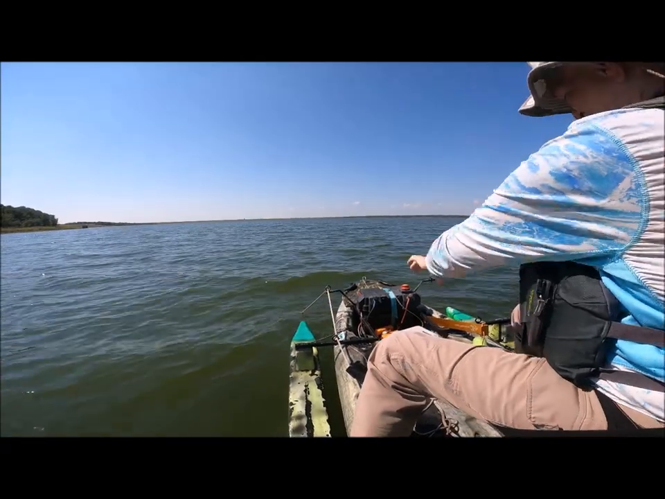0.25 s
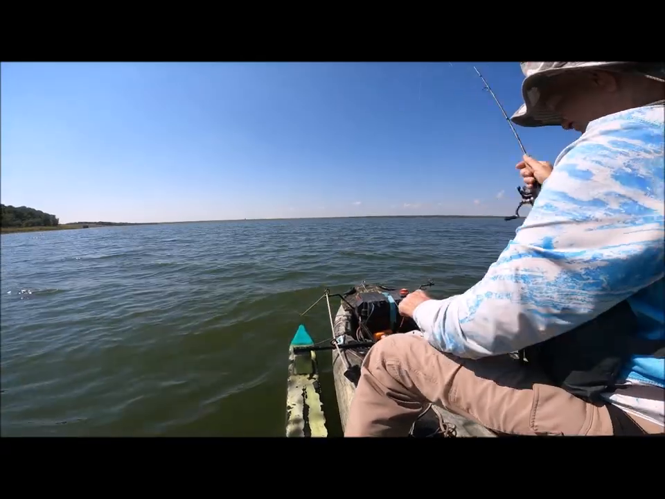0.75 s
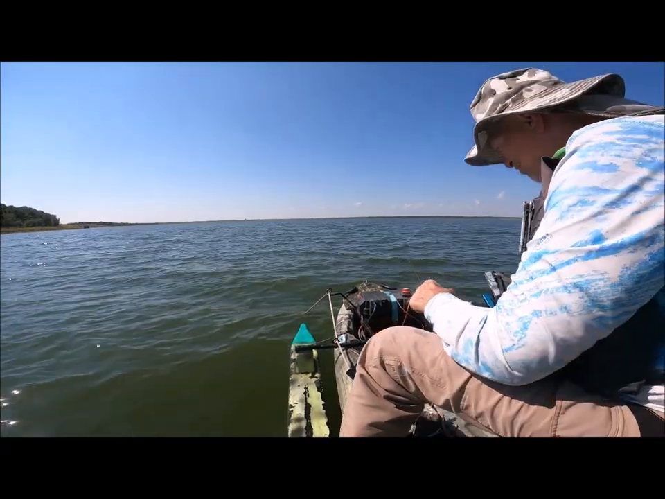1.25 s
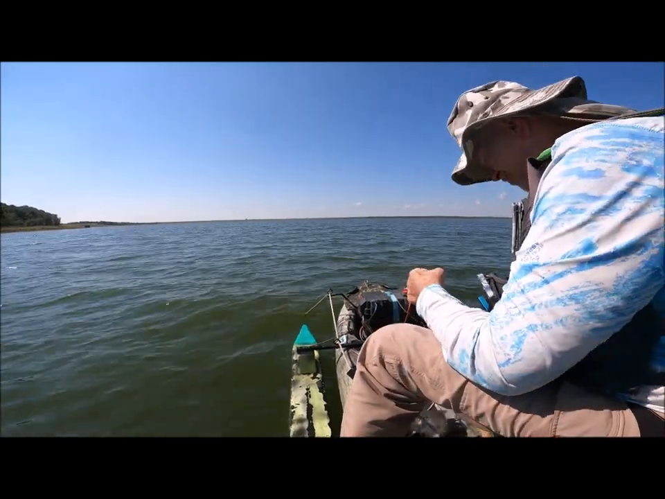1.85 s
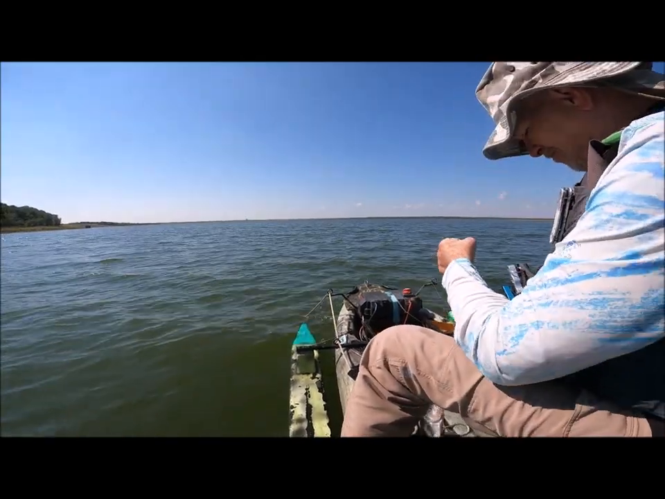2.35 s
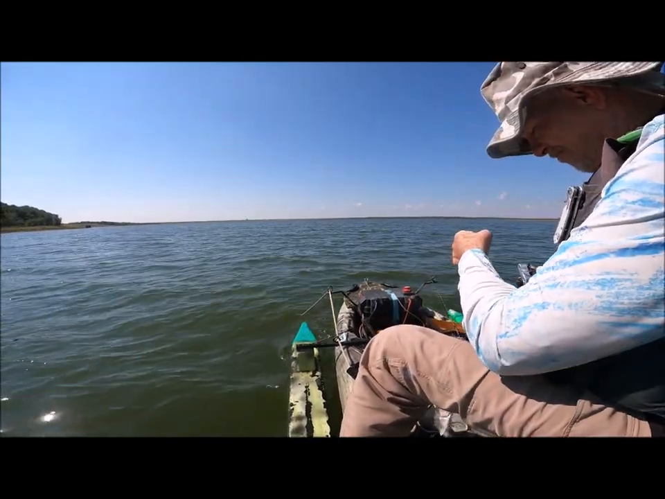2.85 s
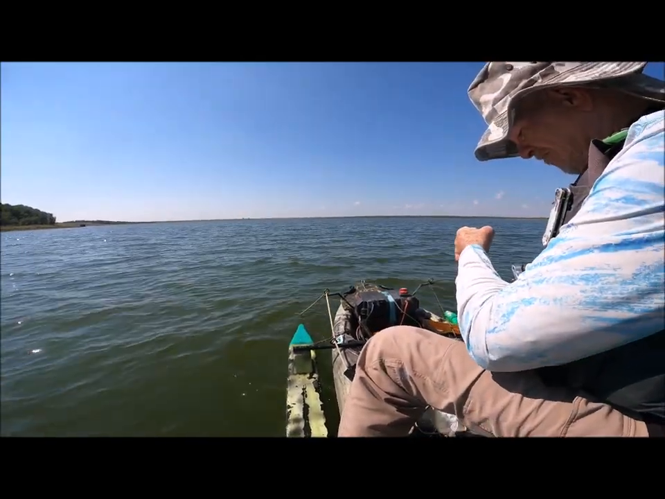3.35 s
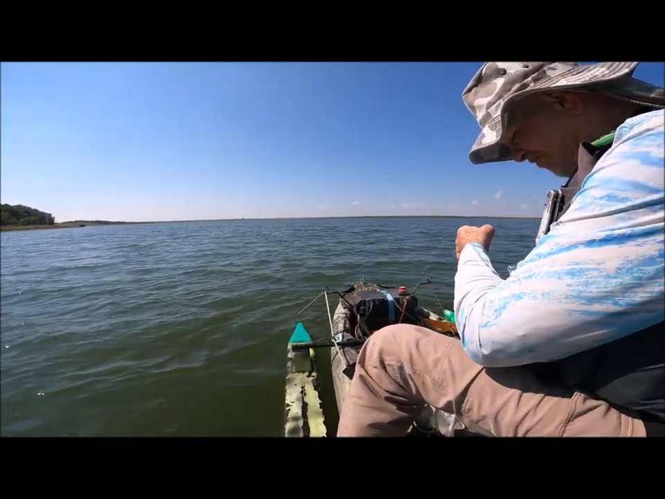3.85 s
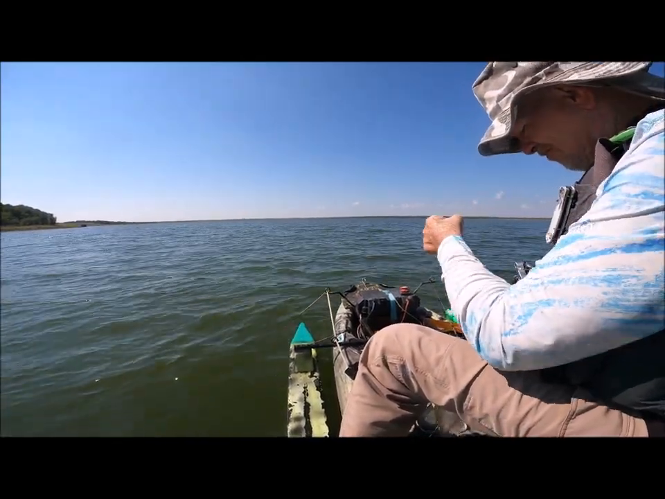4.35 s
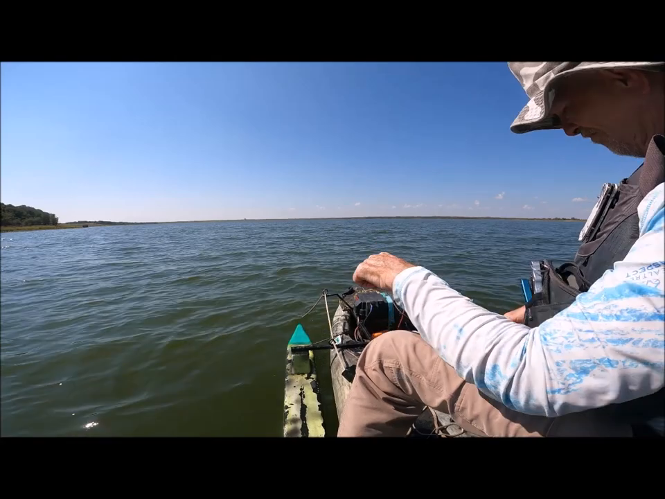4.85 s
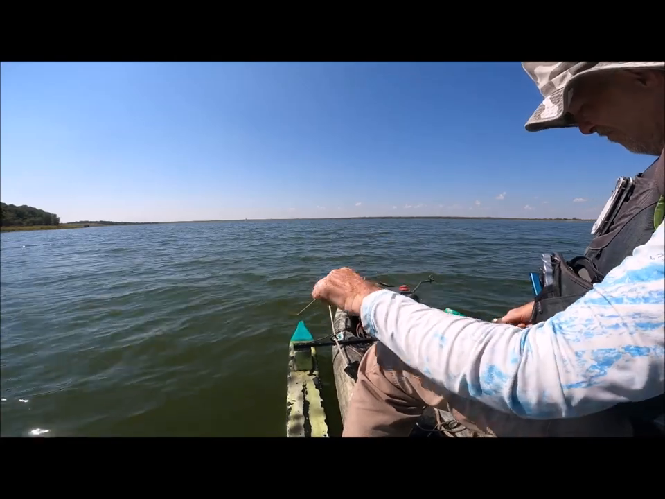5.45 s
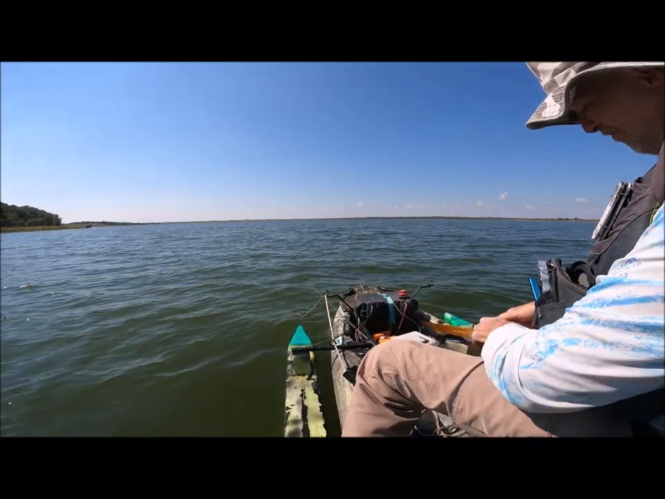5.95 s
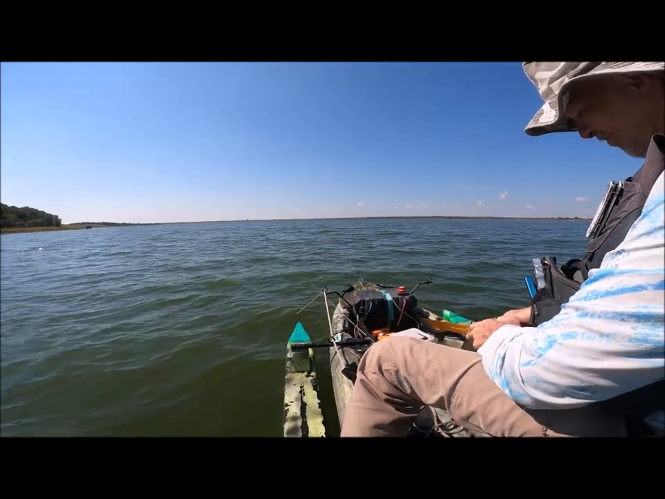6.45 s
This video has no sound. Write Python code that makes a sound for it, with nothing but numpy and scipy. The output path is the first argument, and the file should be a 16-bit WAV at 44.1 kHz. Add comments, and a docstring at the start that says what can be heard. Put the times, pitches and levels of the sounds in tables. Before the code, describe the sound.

Close on a small boat, water churns and trickles under the hull. Faint laps begin, then hard plastic knocks, bright tackle clicks and short rasps cluster around the loudest hollow slap just before two seconds. The middle calms to gurgling plips and lighter slaps; the end brings another run of wet, booming slaps. A sleeve rustles faintly and wind buffets the microphone outdoors.

```python
"""Choppy lake water slaps a hollow plastic kayak: trapped air thumps, the hull rings, spray splashes.
Light laps open the scene; soon an angler's gear knocks, clicks and rasps (noise bursts, damped partials),
and the heaviest slap lands at 1.84 s. Drips and gurgles (gliding sines) lead on past 3.5 s to a second
run of strong slaps from 5.1 to 6.1 s. Throughout, bubbles and noise churn under the hull, a sleeve
rustles, the boat heaves with a deep rumble, a faint hiss comes and goes and wind buffets the microphone."""
import sys
import numpy as np
from scipy import signal
from scipy.fft import rfft, irfft, next_fast_len
from scipy.io import wavfile
from scipy.ndimage import uniform_filter1d, map_coordinates

SR = 44100
rng = np.random.default_rng(int(sys.argv[2]) if len(sys.argv) > 2 else 0)


def bounce(signal):
    """Save signal as a 16-bit WAV file at the path given by the first command-line argument."""
    frames = np.transpose(np.atleast_2d(signal))
    limited = np.clip(frames, -1, 1)
    pcm = np.round(limited * 32767).astype(np.int16)
    wavfile.write(sys.argv[1], SR, pcm)


N = 295417

# waves meeting the hull: [t/s, level/dB, air pocket f/Hz,
# hardness/dB (0 = flat smack, -30 = soft gulp), pocket t60/s]
WAVE_SLAPS = [(0.069, -29.5, 184, -1.5, 0.069), (0.087, -28, 458, -9, 0.074), (0.349, -28, 156, -25, 0.077),
              (0.48, -28, 149, -6, 0.053), (0.658, -31.5, 265, -46, 0.078), (0.865, -29, 229, -18, 0.093),
              (1.181, -30, 141, 2, 0.19), (1.626, -28.5, 156.6, -34, 0.11), (1.725, -27.5, 148, -14, 0.042),
              (1.844, -10, 192, -3.5, 0.071), (1.874, -21.5, 215, -22, 0.055), (1.904, -21, 190, -8, 0.094),
              (2.096, -22, 225, -23, 0.079), (2.118, -30, 167, -41, 0.098), (2.19, -26.5, 217, -2, 0.053),
              (2.262, -25, 270, -21, 0.093), (2.278, -23.5, 271, 4, 0.067), (2.741, -28.5, 182, -2, 0.07),
              (2.84, -31, 165.4, -33, 0.29), (3.179, -28.5, 174, -13, 0.15), (3.2, -19.5, 410, -17, 0.024),
              (3.472, -31.5, 138, -33, 0.087), (3.684, -21, 294, -40, 0.13),
              (4.034, -24.5, 177, -20, 0.077), (4.398, -28.5, 305, -9, 0.034), (4.505, -33, 280, -43, 0.17),
              (4.685, -33.5, 155, -9, 0.19), (4.745, -31.5, 156, -42, 0.2), (4.886, -31.5, 167, -37, 0.13),
              (5.108, -17.5, 240, -12, 0.044), (5.14, -22, 163.4, -25, 0.087),
              (5.366, -38.5, 261, -39, 0.11), (5.385, -33, 182, -36, 0.12), (5.497, -27.5, 186, -7, 0.071),
              (5.715, -27.5, 216, -58, 0.099), (5.784, -17.5, 177.3, -28, 0.085),
              (5.852, -25.5, 206, -4, 0.055), (6.017, -14, 268, -12.5, 0.055),
              (6.059, -15.5, 244, -16, 0.079), (6.494, -35, 194, -23, 0.1), (6.61, -29, 150, -36, 0.081)]
# ring of the hollow hull: [f/Hz, level/dB, t60/s], detuned and re-weighted at each slap
HULL_MODES = [(138, -3.5, 0.28), (172.3, -0.5, 0.31), (214.5, 2, 0.16), (288.4, 2.5, 0.18),
              (341, 0.5, 0.13), (403, -16, 0.091), (482.3, -8, 0.082), (578.4, -8.5, 0.15),
              (664, -29.5, 0.054), (970, -17.5, 0.092)]
# water washing along the hull: [t/s at its height, length/s, level/dB, bubble f/Hz]
HULL_WASHES = [(0.88, 0.11, -54.5, 1360), (1.365, 0.08, -44.5, 1370), (1.6, 0.027, -44, 760),
               (1.86, 0.022, -33.5, 576), (1.996, 0.05, -45.5, 1150), (2.19, 0.038, -45, 796),
               (2.288, 0.055, -44.5, 780), (2.562, 0.086, -55.5, 770), (2.776, 0.097, -50.5, 1330),
               (3.21, 0.023, -47, 596), (3.282, 0.062, -46, 1094), (3.588, .06, -50.5, 890),
               (4.391, 0.044, -48.5, 1520), (5.403, 0.036, -53, 734), (5.47, 0.077, -47, 448),
               (6.058, 0.05, -42.5, 1245)]
# wavelets clapping shut along the hull: [t/s, level/dB, cavity f/Hz]
WAVELET_POPS = [(0.863, -37.5, 640), (0.924, -41.5, 770), (1.098, -40.5, 910), (1.276, -40, 1190),
                (1.317, -41, 564), (1.347, -38, 1670), (1.381, -39, 1770), (1.902, -28, 438),
                (1.975, -37, 1510), (2.132, -31, 933), (2.179, -41, 1900), (2.221, -34, 950),
                (2.746, -32.5, 573), (3.199, -29, 296), (3.454, -36, 1300), (3.52, -40.5, 2200),
                (4.372, -37, 1370), (4.642, -42.5, 1210), (4.699, -38, 1640), (4.759, -36.5, 1650),
                (4.787, -42, 1630), (5.107, -28.5, 1320), (5.357, -33.5, 1040), (5.383, -26, 1064),
                (5.56, -28.5, 566), (6.017, -25.5, 393)]
# drops and gurgling bubbles beside the boat: [t/s, level/dB, f/Hz, glide/(octaves per s), t60/s]
WATER_PLIPS = [(0.49, -37.5, 498, 0.5, 0.14), (1.847, -21, 332, -1.5, 0.11),
               (2.665, -42.5, 1650, -2.5, 0.077), (2.757, -42, 1770, 3, .05), (2.795, -44, 1660, 1, 0.088),
               (3.566, -46, 1146, -10, .06), (3.578, -35.5, 368, -12, 0.069), (3.734, -33, 283, -4, 0.15),
               (4.036, -32.5, 342, 0, 0.18), (4.073, -46.5, 1750, 1, 0.046), (4.106, -48, 2510, 8, 0.074),
               (4.126, -40, 1700, 16, 0.038), (4.291, -40, 995, -20.5, 0.045),
               (4.376, -32, 324, -20, 0.087), (4.518, -39.5, 576, 0.5, 0.16),
               (5.366, -40.5, 1174, -5.5, 0.15), (5.392, -38.5, 956, -14.5, 0.096),
               (5.454, -36.5, 379, -2, 0.36), (5.493, -40.5, 780, 2, 0.082), (6.496, -34, 345, 1, 0.2)]
# slosh under the hull between slaps: [t/s, level/dB]
CHOP_LEVEL = [(0.0, -39.5), (0.24, -53.5), (1.38, -38), (1.68, -48), (2.03, -45), (2.75, -40.5),
              (2.97, -44.5), (4.25, -51.5), (5.0, -47), (5.45, -47.5), (5.6, -48.5), (6.36, -48),
              (6.7, -48.5)]
# hull heaving on a swell or under the angler's weight: [t/s at its height, level/dB]
HULL_HEAVES = [(0.4, -34.5), (0.578, -35.5), (0.898, -41), (1.231, -33.5), (1.508, -37), (1.87, -29),
               (4.529, -36), (4.722, -41), (5.14, -38), (5.478, -36), (5.665, -37), (5.828, -33),
               (6.101, -29.5), (6.471, -34.5), (6.6, -32)]
# hard gear on the deck: [t/s, level/dB, brightness/dB (above 0 = sharp edge, below = dull boom), t60/s]
GEAR_KNOCKS = [(0.9754, -23, 7.5, 0.072), (1.271, -35, 0.5, 0.34), (1.502, -18, 5.5, 0.068),
               (1.524, -19.5, 13.5, 0.041), (1.547, -32.5, 9, 0.25), (1.9746, -23.5, 2.5, 0.065),
               (2.074, -15.5, 4, 0.059), (2.132, -16.5, -2, 0.034), (2.2204, -22, 0.5, 0.11),
               (2.656, -32, 0, 0.11), (2.997, -33.5, 2, 0.12), (3.159, -32.5, 14, 0.053),
               (4.494, -26, 3, 0.073), (5.071, -32.5, 4, 0.47), (5.5615, -25, -4, 0.096),
               (6.082, -25, 3.5, 0.13)]
# small tackle clicking: [t/s, level/dB, f/Hz, crack level/dB re the click]
TACKLE_CLICKS = [(0.334, -55, 5200, -6), (0.685, -58, 5170, -1.5), (0.717, -60, 5200, -2),
                 (0.4545, -48.5, 3540, -6), (1.5485, -24, 3940, -26), (1.652, -43.5, 5180, -16),
                 (1.736, -46.5, 5120, -4.5), (1.8265, -39, 2970, -15), (2.055, -29, 4210, -13.5),
                 (2.33, -33, 3700, -21), (2.4465, -36.5, 2910, -14.5), (2.537, -48, 4400, -3),
                 (2.628, -36.5, 3560, -38), (2.6597, -31.5, 5070, -35), (2.776, -51, 4440, -5),
                 (3.012, -42, 5500, -22), (3.14, -39.5, 4400, -17), (3.241, -26, 4040, -20),
                 (3.326, -66.5, 5230, 7), (5.074, -33.5, 4510, -27), (5.751, -41, 5000, -6),
                 (5.97, -42, 4220, -25), (6.284, -37.5, 2820, -32), (6.47, -53.5, 6800, -10)]
# partials of a piece of tackle: [multiple of its pitch, level/dB]
TACKLE_PARTIALS = [(.71, -10), (0.901, -1.5), (1, 2), (1.119, -5.5), (1.47, -17), (1.83, -21), (2.6, -36)]
# gear sliding on gear: [t/s at its height, length/s, level/dB, f/Hz]
GEAR_RUBS = [(0.443, 0.042, -55, 2880), (0.585, 0.1, -50, 2750), (1.519, 0.038, -46.5, 3080),
             (1.736, 0.026, -56.5, 4600), (2.064, 0.045, -51.5, 5240), (2.27, 0.031, -44.5, 3150),
             (2.562, 0.058, -50.5, 3420), (3.201, 0.058, -51, 3250), (5.999, 0.019, -49.5, 2580),
             (6.054, 0.028, -47.5, 3880)]
# movements of the arm: [t/s at their height, length/s, rustle level/dB]
ARM_REACHES = [(0.52, 0.77, -67.5), (1.45, 1, -66), (2.18, 0.25, -59), (2.626, 0.3, -60.5),
               (4.953, 0.57, -66)]
# high hiss: [t/s, level/dB]
HISS_CURVE = [(0, -80), (0.3, -91), (0.55, -78), (0.75, -90), (1.3, -85), (1.9, -88), (2.03, -71),
              (2.15, -74), (2.3, -82), (2.42, -107), (3.2, -82), (3.7, -107), (4.8, -97.5), (6.7, -94)]
# wind strength before trim and gusts: [t/s, level/dB]
WIND_STRENGTH = [(0.0, -45), (0.33, -44.5), (1.49, -46), (2.42, -37.5), (2.65, -45.5), (3.69, -44.5),
                 (3.9, -49.5), (4.85, -57), (6.29, -39.5), (6.7, -39)]

# colour of the water thrown up by a slap: [f/Hz, level/dB]
SPLASH_COLOUR = [(150, -25), (350, 15.5), (700, 4.5), (1200, -6.5), (2000, -12), (4000, -23.5), (7000, -35),
                 (9000, -42.5)]
# colour of a cloud of bubbles: [multiple of its pitch, level/dB]
FROTH_COLOUR = [(.25, -9), (.55, 5.5), (1, -1), (1.5, -8.5), (2.4, -15.5), (5, -30.5)]
# colour of the water churning under the hull: [f/Hz, level/dB]
SLOSH_COLOUR = [(60, -30), (110, -8.5), (165, -2.5), (230, -7), (320, -8.5), (430, -12.5), (560, -17),
                (800, -24), (1500, -37.5)]
# colour of the small bubbles along the hull: [f/Hz, level/dB]
TRICKLE_COLOUR = [(300, -10), (550, -2.5), (1000, -4.5), (1700, -2.5), (2600, -11.5), (4500, -19.5),
                  (9000, -38.5)]
# colour of the heaving boat: [f/Hz, level/dB]
HEAVE_COLOUR = [(10, -31), (22, -0.5), (55, -2), (85, -3), (105, -8), (150, -11.5)]
# colour of the body of a knock: [f/Hz, level/dB]
CLACK_COLOUR = [(400, 11.5), (1000, 1.5), (1800, -0.5), (3200, 0.5), (5000, -25), (8000, -45)]
# colour of the plastic deck booming: [f/Hz, level/dB]
DECK_COLOUR = [(80, -30), (170, -6), (450, -3), (590, 3), (720, -9.5), (1000, -5), (1600, -14), (4000, -47)]
# colour of the bright edge of a knock: [f/Hz, level/dB]
EDGE_COLOUR = [(1800, -16), (3800, 8), (6500, 1), (7800, -12.5), (10500, -13.5), (13000, -21), (15000, -26)]
# colour of the crack of a click: [f/Hz, level/dB]
CRACK_COLOUR = [(2000, -16), (4000, 7.5), (6500, 5.5), (7800, -3.5), (10000, -4), (13000, -11.5),
                (15000, -28)]
# colour of a rubbed piece: [multiple of its pitch, level/dB]
SCRAPE_COLOUR = [(.3, -3), (.62, -3), (.8, -3.5), (.87, -2), (.96, 0), (1.02, -3.5), (1.09, -2.5),
                 (1.14, -13), (1.2, 2), (1.35, -11.5), (2.2, -16.5), (2.7, -41), (4, -30.5), (5.5, -46)]
# colour of rustling cloth: [f/Hz, level/dB]
RUSTLE_COLOUR = [(1200, -17.5), (2500, 1.5), (3400, -0.5), (5000, -5.5), (6600, -7), (7700, -18.5),
                 (12000, -23.5), (15000, -28.5)]
# colour of the high hiss: [f/Hz, level/dB]
HISS_COLOUR = [(5000, -24), (8000, 1), (10000, 5), (12500, -0.5), (15000, -17.5)]
# colour of the wind at the microphone: [f/Hz, level/dB]
WIND_COLOUR = [(10, -28.5), (20, -6.5), (35, -5), (60, -3), (80, -3.5), (105, -11), (150, -10), (300, -37)]

WALL_HZ, SMACK_DB = 640, 4  # the patch of wall a wave strikes; smack level at hardness 0
# splash and hull ring at hardness 0, re the slap; GROWS = dB per dB of hardness
SPLASH_DB, SPLASH_GROWS, SPLASH_T60_S = -13, 0.19, 0.11
SHELL_DB, SHELL_GROWS = -9.5, 0.33
# churning after a slap of 0 dB; GROWS = dB per dB of slap level
WAKE_DB, WAKE_RISE_S, WAKE_T60_S, WAKE_GROWS = -25, 0.018, 0.47, 0.49
POP_RISE_CYCLES, POP_CLIMB_OCTAVES = 2.07, 0.1  # time to the peak; climb in that time
POP_OVERTONE, POP_OVERTONE_DB = 2.15, -19.5  # multiple of the pitch; re the cavity
POP_FROTH_DB, POP_FROTH_T60_S = -12.5, 0.074
PLIP_RISE_CYCLES = 0.77  # big bubbles start more softly
PUFF_DB, PUFF_T60_S = -10.5, 0.14  # smaller bubbles round a plip
TRICKLE_DB, TRICKLE_GROWS = -57.5, 0.31  # level at average chop; dB per dB of chop
HEAVE_S = 0.065
# at brightness 0; FALLS = dB the boom loses per dB of brightness
BOOM_DB, BOOM_FALLS, EDGE_DB = -12, 1.85, -28
TACKLE_T60_S = 0.044
STILL_DB = -71  # rustle between movements
WIND_TRIM_DB, GUST_DB, GUST_KNOTS_PER_S = 3.5, 2, 7
TOP_HZ = 15600  # upper band limit


def slaps():
    """A wave shuts an air pocket on the hull: pocket bounces, wall smacks, shell rings, water splashes."""
    out, t = np.zeros(N), np.arange(SR // 3) / SR
    for s, db, hz, hard_db, t60 in WAVE_SLAPS:
        splash_db = SPLASH_DB + SPLASH_GROWS * hard_db
        ring_db = SHELL_DB + SHELL_GROWS * hard_db
        # the pocket climbs slightly in pitch as it dies
        pocket = np.sin(2 * np.pi * hz * t * (1 + 0.11 * t)) * fade(t, t60, attack=0.0017)
        # the wetted wall is heavily damped: it gives only a few cycles
        wall_hz = WALL_HZ * rng.normal(1, 0.035)
        smack = np.sin(2 * np.pi * wall_hz * t) * fade(t, t60=0.014, attack=0.0011)
        shell = hull_ring(t)
        splash = burst(t, SPLASH_COLOUR, SPLASH_T60_S, attack=0.00058)
        # the crest hisses up the wall as the wave closes in
        crest = graze(t, SPLASH_COLOUR, t60=.05)
        add(out, s - t[-1], amp(db + splash_db - 7) * crest)
        thump = amp(2.5) * pocket + amp(hard_db + SMACK_DB) * smack
        add(out, s, amp(db) * (thump + amp(ring_db) * shell + amp(splash_db) * splash))
    return out


def hull_ring(t):
    """The shell's damped modes; the water's load shifts their pitch and strength at each wave."""
    ring = np.zeros(len(t))
    for hz, db, t60 in HULL_MODES:
        detune, strength = rng.standard_normal(2)
        tone = np.sin(2 * np.pi * hz * (1 + 0.035 * detune) * t)
        ring += amp(db + 2 * strength) * tone * fade(t, t60, attack=0.0038)
    return ring


def wake():
    """How stirred up the water is: it swells after each slap and settles, powers adding up."""
    power, t = np.zeros(N), np.arange(SR) / SR
    for s, db, *_ in WAVE_SLAPS:
        add(power, s, (amp(WAKE_GROWS * db) * fade(t, WAKE_T60_S, WAKE_RISE_S)) ** 2)
    return np.sqrt(power)


def washes():
    """A crest runs along the hull and sheds froth, with a few bubbles standing out of it."""
    out = np.zeros(N)
    for s, length, db, hz in HULL_WASHES:
        shape = swell(length)
        cloud = bubbles(count=7000, hz=hz, spread=0.367, cycles=16, rise=0, size_db=7.0, size=500)
        cloud = unit(cloud[:len(shape)])
        froth = coloured(ragged(len(shape), patchy_db=0.5), pitched(FROTH_COLOUR, hz))
        add(out, s - length, amp(db) * shape * unit(froth + 0.57 * cloud))
    return out


def pops():
    """A wavelet claps shut: its cavity swells and dies in a few climbing cycles, leaving a little froth."""
    out, t = np.zeros(N), np.arange(SR // 8) / SR
    for s, db, hz in WAVELET_POPS:
        age = t * hz / POP_RISE_CYCLES  # 1 at the peak
        pitch = hz * 2 ** (POP_CLIMB_OCTAVES * (np.minimum(age, 2) - 1))
        phase = 2 * np.pi * np.cumsum(pitch) / SR
        tone = np.sin(phase) + amp(POP_OVERTONE_DB) * np.sin(POP_OVERTONE * phase)
        cavity = tone * (age * np.exp(1 - age)) ** 2
        froth = burst(t, pitched(FROTH_COLOUR, 1.23 * hz), POP_FROTH_T60_S, attack=0.0017)
        add(out, s, amp(db) * (cavity + amp(POP_FROTH_DB) * froth))
    return out


def plips():
    """Bubbles ring and glide, up nearing the surface or down spreading under the hull, in a froth puff."""
    out, t = np.zeros(N), np.arange(SR // 4) / SR
    for s, db, hz, glide, t60 in WATER_PLIPS:
        pitch = hz * 2 ** (glide * np.minimum(t, t60))
        bubble = np.sin(2 * np.pi * np.cumsum(pitch) / SR) * fade(t, t60, PLIP_RISE_CYCLES / hz)
        puff = burst(t, pitched(FROTH_COLOUR, 0.78 * hz), PUFF_T60_S, attack=0.0012)
        add(out, s, amp(db) * (amp(0.5) * bubble + amp(PUFF_DB) * puff))
    return out


def lapping():
    """Big bubbles gurgle under the hull, stirred by chop and slaps, and small ones trickle along it."""
    chop_db, = curves(CHOP_LEVEL)
    gurgle = bubbles(count=420, hz=279.9, spread=0.551, cycles=9.3, rise=0.095, size_db=2.5, size=4000)
    patter = bubbles(count=2400, hz=1101.5, spread=0.557, cycles=15.0, rise=0.047, size_db=2.5, size=1200)
    slosh = coloured(unit(gurgle) + 4 * rng.standard_normal(N), SLOSH_COLOUR)
    trickle = coloured(unit(patter) + 2.56 * rng.standard_normal(N), TRICKLE_COLOUR)
    churn = np.hypot(amp(chop_db), amp(WAKE_DB) * wake())
    trickle_db = TRICKLE_DB + TRICKLE_GROWS * (chop_db - chop_db.mean())
    return churn * slosh + amp(trickle_db) * trickle


def rocking():
    """Each heave of the boat is a short, deep rumble through the deck."""
    out, shape = np.zeros(N), swell(HEAVE_S)
    for s, db in HULL_HEAVES:
        rumble = coloured(rng.standard_normal(len(shape)), HEAVE_COLOUR)
        add(out, s - HEAVE_S, amp(db) * shape * rumble)
    return out


def knocks():
    """Hard gear lands on deck: a graze, then a clack with a bright edge over the plastic's short boom."""
    out, t = np.zeros(N), np.arange(SR // 4) / SR
    for s, db, bright_db, t60 in GEAR_KNOCKS:
        boom_db = BOOM_DB - BOOM_FALLS * bright_db
        edge_db = EDGE_DB + bright_db
        clack = burst(t, CLACK_COLOUR, t60, attack=0.0014)
        boom = burst(t, DECK_COLOUR, 1.7 * t60, attack=0.001)
        edge = burst(t, EDGE_COLOUR, t60, attack=.0012)
        dull_graze = amp(db - 25) * graze(t, CLACK_COLOUR, t60=.06)
        bright_graze = amp(db + edge_db - 11) * graze(t, EDGE_COLOUR, t60=.05)
        add(out, s - t[-1], dull_graze + bright_graze)
        add(out, s, amp(db) * (amp(-10.5) * clack + amp(boom_db) * boom + amp(edge_db) * edge))
    return out


def clicks():
    """Small hard parts brush and touch: a crack and a brief high ring."""
    out, t = np.zeros(N), np.arange(SR // 6) / SR
    for s, db, hz, crack_db in TACKLE_CLICKS:
        ring = np.zeros(len(t))
        for ratio, level in TACKLE_PARTIALS:
            # loose parts chatter: a random walk in phase blurs their ring
            chatter = .035 * np.cumsum(rng.standard_normal(len(t)))
            ring += amp(level) * np.sin(2 * np.pi * min(hz * ratio, TOP_HZ) * t + 2 * chatter)
        ring *= fade(t, TACKLE_T60_S, attack=.0015)
        crack = burst(t, CRACK_COLOUR, TACKLE_T60_S, attack=.0012)
        brush = graze(t, CRACK_COLOUR, t60=.04)
        add(out, s - t[-1], amp(db + crack_db - 12) * brush)
        add(out, s, amp(db) * (amp(-11) * ring + amp(crack_db + 2.5) * crack))
    return out


def rubs():
    """Sliding gear sticks and slips: rapidly fluctuating noise makes a fine rasp."""
    out = np.zeros(N)
    for s, length, db, hz in GEAR_RUBS:
        shape = swell(length)
        grip = amp(2.2 * wobble(382.4)[:len(shape)])
        slips = rng.standard_normal(len(shape)) * grip
        add(out, s - length, amp(db) * shape * coloured(slips, pitched(SCRAPE_COLOUR, hz)))
    return out


def sleeve():
    """Cloth and line rub with each movement of the arm: a soft, uneven hiss with fine crackles."""
    power = np.full(N, amp(STILL_DB) ** 2)
    for s, length, db in ARM_REACHES:
        add(power, s - length, amp(db) ** 2 * swell(length))
    # very short damped sines serve as crackles
    crackle = bubbles(count=3000, hz=4700, spread=0.28, cycles=3.5, rise=0, size_db=2.0, size=200)
    cloth = coloured(0.29 * unit(crackle) + ragged(N, patchy_db=6.5), RUSTLE_COLOUR)
    return np.sqrt(power) * amp(1.1 * wobble(67)) * cloth


def hiss():
    """A smooth, high noise band whose level comes and goes."""
    level_db, = curves(HISS_CURVE)
    return amp(level_db) * coloured(rng.standard_normal(N), HISS_COLOUR)


def wind():
    """Eddies buffet the microphone port: low noise with randomly wavering gusts."""
    strength_db, = curves(WIND_STRENGTH)
    gusts_db = GUST_DB * wobble(GUST_KNOTS_PER_S)
    return amp(strength_db + WIND_TRIM_DB + gusts_db) * coloured(rng.standard_normal(N), WIND_COLOUR)


def bubbles(count, hz, spread, cycles, rise, size_db, size):
    """Randomly timed damped sines of scattered pitch that can climb as they fade."""
    when, rarity = rng.random((2, count, 1))
    pitch = np.clip(hz * np.exp(spread * rng.standard_normal((count, 1))), 60, SR / 3)
    turns = pitch * np.arange(size) / SR
    age = turns / cycles
    tone = np.sin(2 * np.pi * turns * (1 + rise * np.minimum(age, 2)))
    grain = tone * np.exp(-np.e * age) * (1 - np.exp(-2 * turns))
    grain = grain * np.minimum(1, np.linspace(10, 0, size))  # closing fade over the last tenth
    gain = amp(-size_db * np.log(np.maximum(rarity, .03)))  # few are loud
    index = (when * N).astype(int) + np.arange(size)
    return np.bincount(index.ravel(), (gain * grain).ravel(), N)[:N]


def ragged(size, patchy_db):
    """Noise clumped in small patches of time and pitch, like a crowd of tiny contacts or droplets."""
    spectrum = signal.stft(rng.standard_normal(size + 512), nperseg=512)[2]
    field = rng.standard_normal(spectrum.shape)
    for axis in (0, 1):
        field = uniform_filter1d(field, size=3, axis=axis)
    return unit(signal.istft(spectrum * amp(patchy_db * unit(field)), nperseg=512)[1][:size])


def coloured(x, points):
    """x shaped by (Hz, dB) points, all but silent from an octave beyond the last, at rms 1."""
    m = next_fast_len(len(x) + 8192)
    hz, db = np.transpose([*points, (2 * points[-1][0], -120)])
    log_hz = np.log(np.fft.rfftfreq(m, 1 / SR) + 1)
    gain = amp(np.interp(log_hz, np.log(hz), db))
    return unit(irfft(rfft(x, m) * gain, m)[:len(x)])


def pitched(shape, hz):
    """A colour given in multiples of a pitch, as (Hz, dB) points."""
    return [(hz * ratio, db) for ratio, db in shape]


def burst(t, colour, t60, attack):
    """A dying puff of ragged, coloured noise."""
    return coloured(ragged(len(t), patchy_db=3), colour) * fade(t, t60, attack)


def graze(t, colour, t60):
    """A reversed burst: noise that swells up and stops short."""
    return burst(t, colour, t60, attack=0.00055)[::-1]


def fade(t, t60, attack):
    """A quick rise and an exponential decay, both in seconds."""
    return amp(-60 * t / max(t60, .004)) * (1 - np.exp(-t / attack))


def swell(length):
    """A smooth rise and fall that stays above half height for length seconds."""
    return np.hanning(int(2 * max(length, .005) * SR))


def wobble(rate):
    """A smooth random curve, rate knots a second."""
    return map_coordinates(rng.standard_normal(512), [np.arange(N) * rate / SR], mode="wrap")


def curves(rows):
    """One value per sample for each column after the time."""
    s, *cols = np.transpose(rows)
    return [np.interp(np.arange(N) / SR, s, c) for c in cols]


def add(track, s, sound):
    """Mix a sound into the track at s seconds, or at the very start if s is negative."""
    part = track[max(round(s * SR), 0):][:len(sound)]
    part += sound[:len(part)]


def amp(db):
    """Decibels to linear gain."""
    return 10 ** (np.asarray(db) / 20)


def unit(x):
    """x scaled to rms 1."""
    return x / np.sqrt(np.mean(x ** 2) + 1e-20)


def scene():
    """Water, gear, hiss and wind mixed to one channel; open water gives no echoes."""
    water = slaps() + washes() + pops() + plips() + lapping() + rocking()
    gear = knocks() + clicks() + rubs() + sleeve()
    return (water + gear + hiss() + wind())[None]


def record(dry):
    """A brick-wall low-pass: nothing passes at or above the band limit."""
    m = next_fast_len(N + 8192)
    passband = np.fft.rfftfreq(m, 1 / SR) < TOP_HZ
    return irfft(rfft(dry, m) * passband, m)[..., :N]


dry = scene()
out = record(dry)
bounce(out)
```